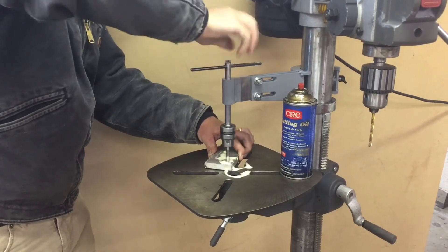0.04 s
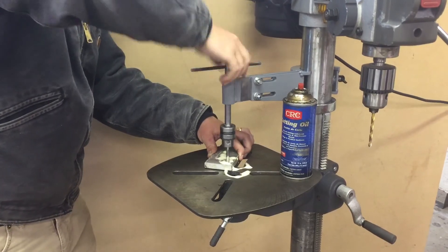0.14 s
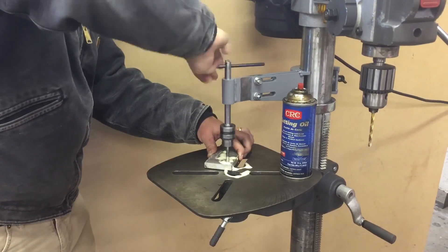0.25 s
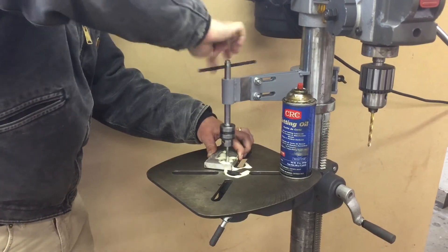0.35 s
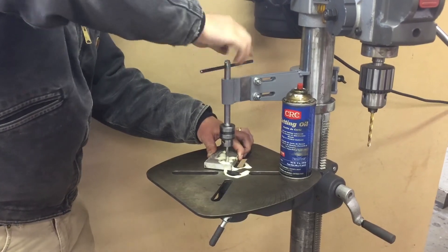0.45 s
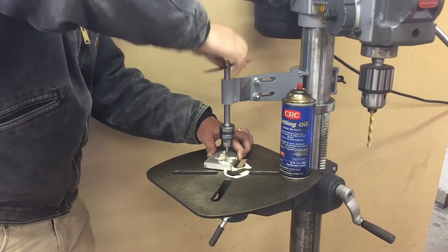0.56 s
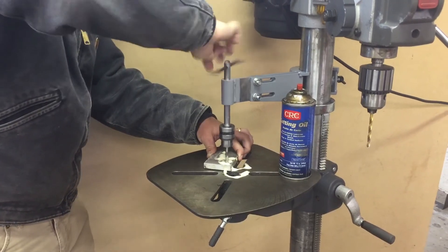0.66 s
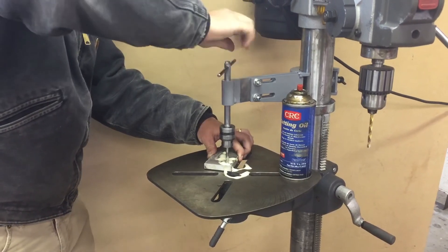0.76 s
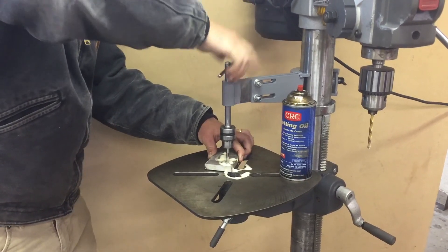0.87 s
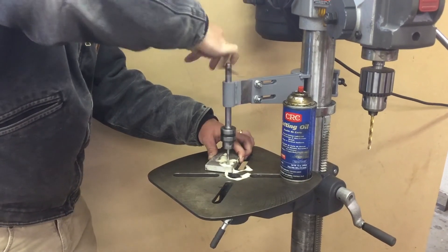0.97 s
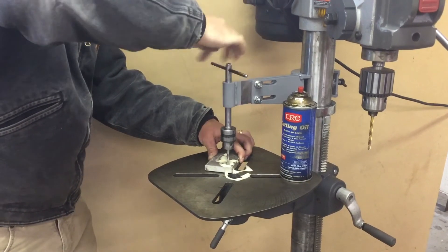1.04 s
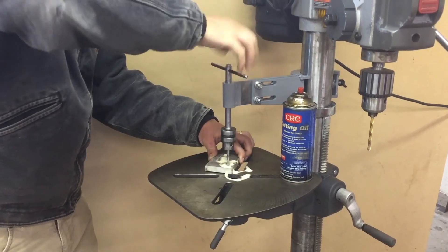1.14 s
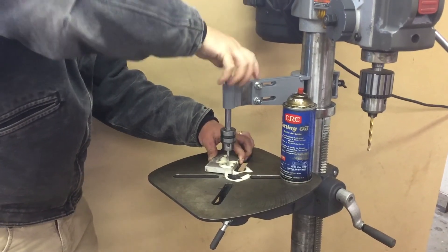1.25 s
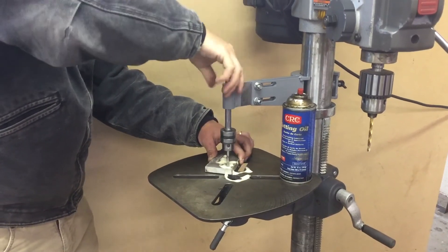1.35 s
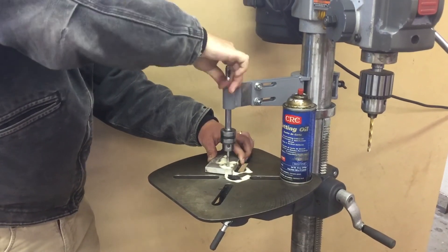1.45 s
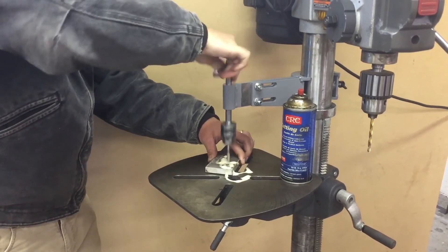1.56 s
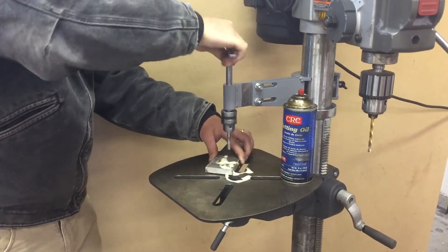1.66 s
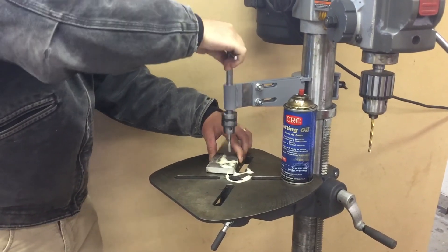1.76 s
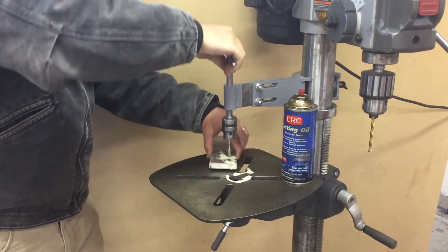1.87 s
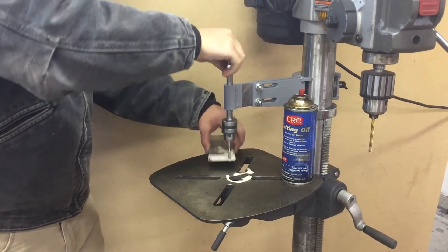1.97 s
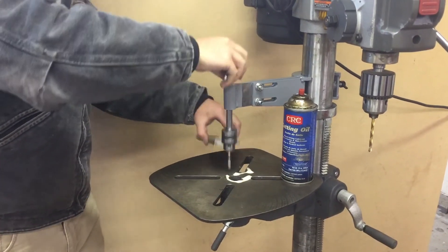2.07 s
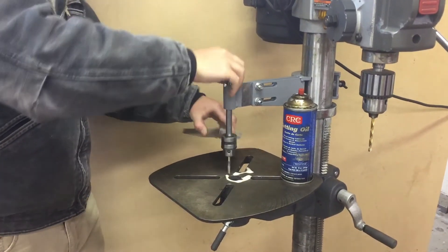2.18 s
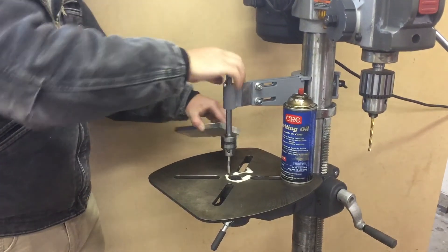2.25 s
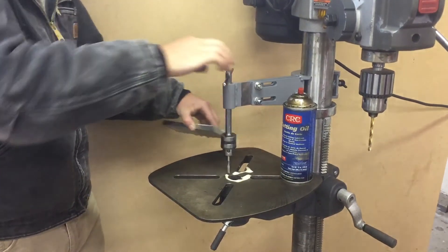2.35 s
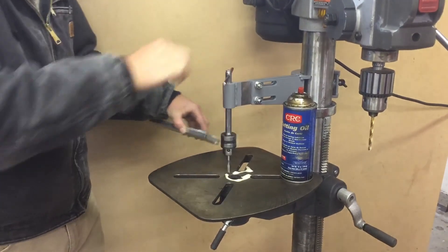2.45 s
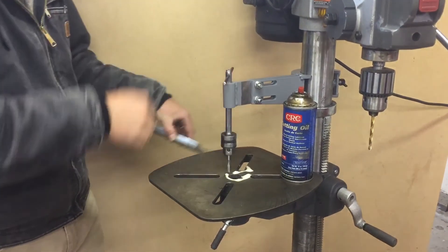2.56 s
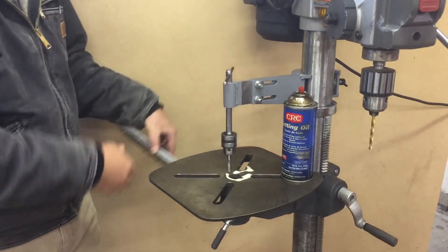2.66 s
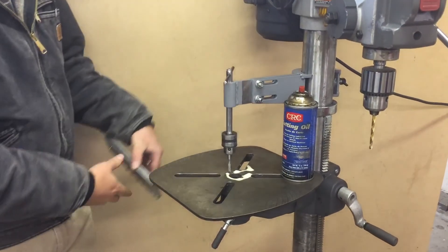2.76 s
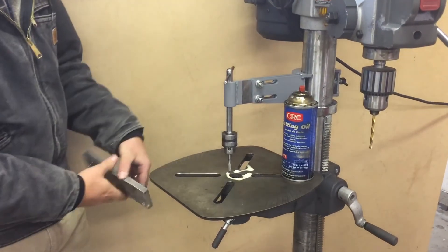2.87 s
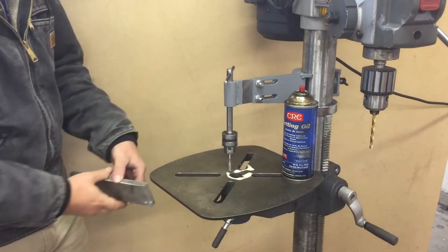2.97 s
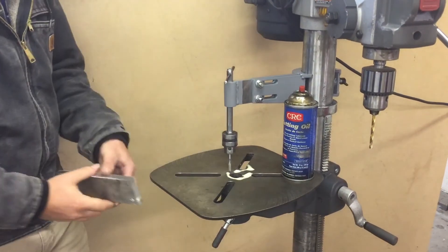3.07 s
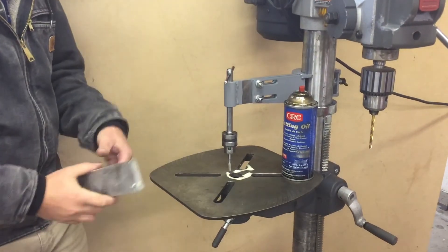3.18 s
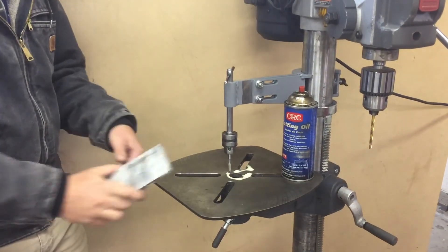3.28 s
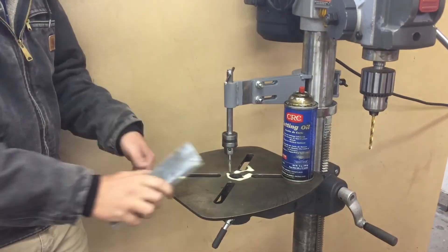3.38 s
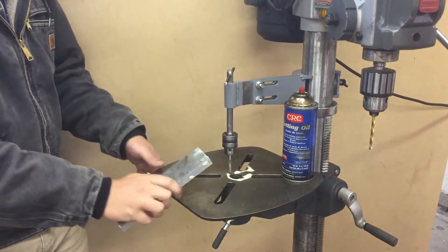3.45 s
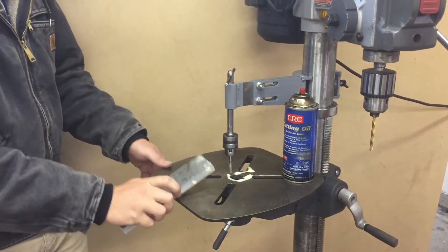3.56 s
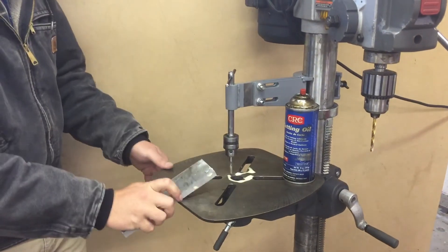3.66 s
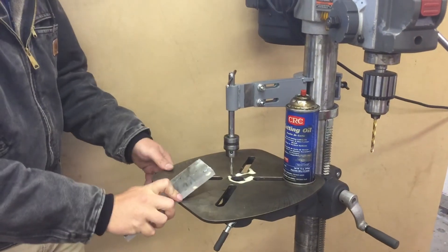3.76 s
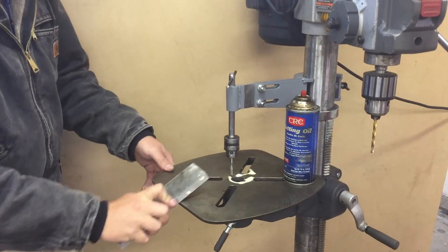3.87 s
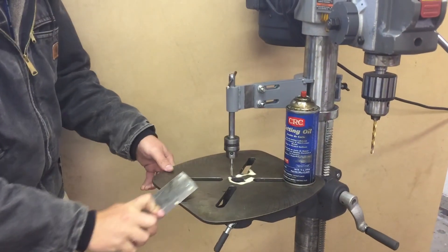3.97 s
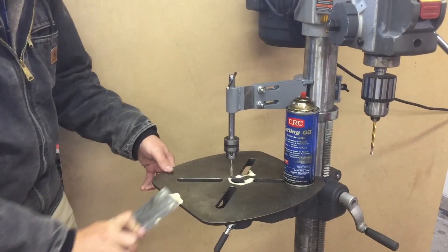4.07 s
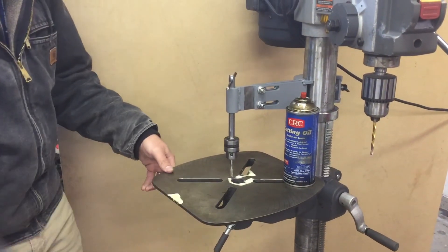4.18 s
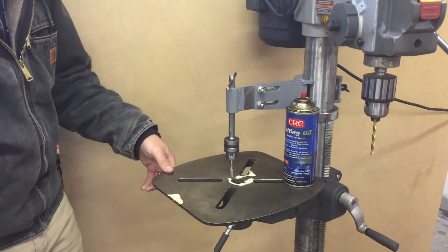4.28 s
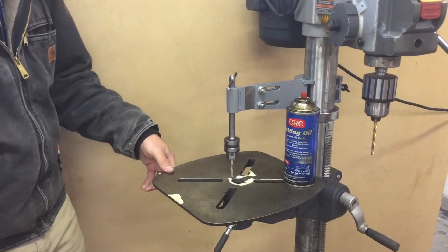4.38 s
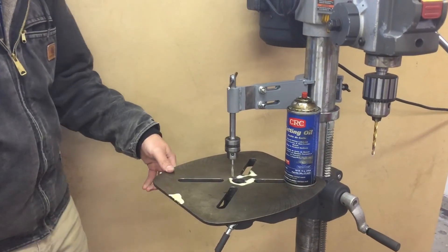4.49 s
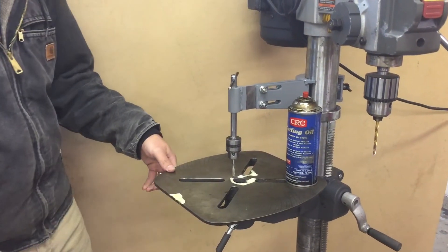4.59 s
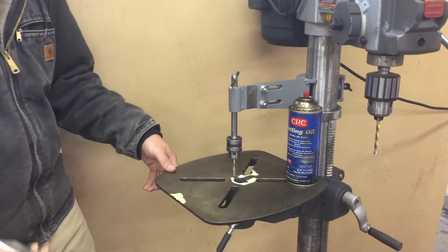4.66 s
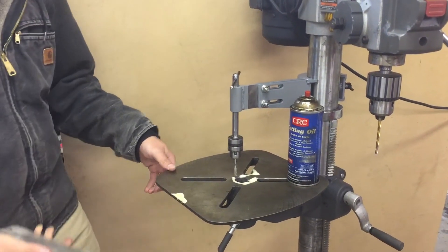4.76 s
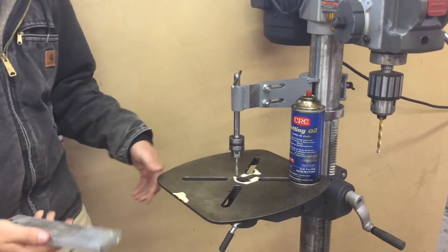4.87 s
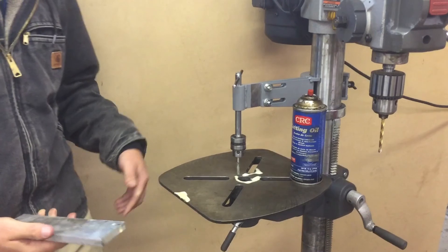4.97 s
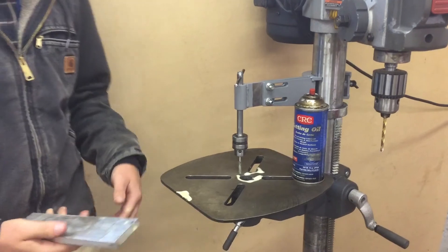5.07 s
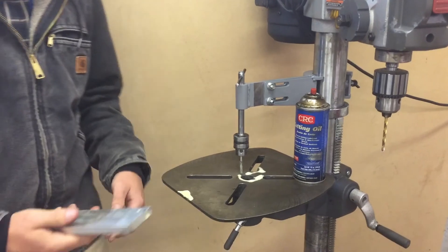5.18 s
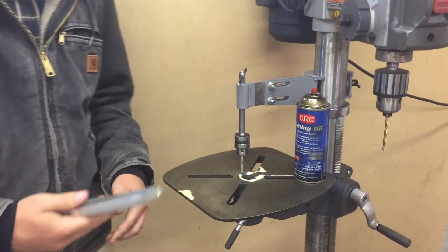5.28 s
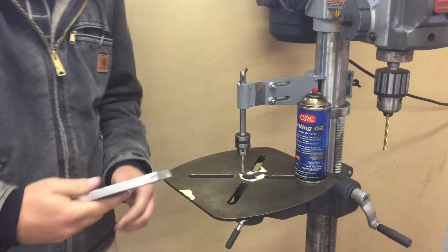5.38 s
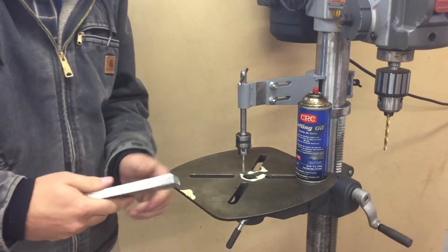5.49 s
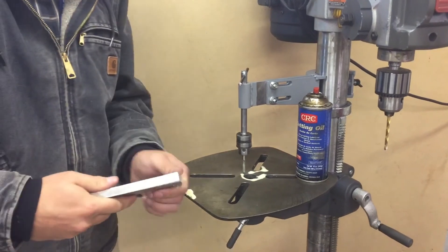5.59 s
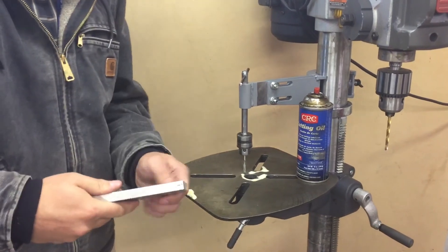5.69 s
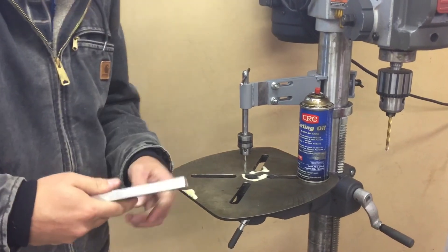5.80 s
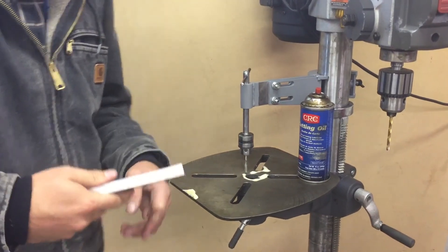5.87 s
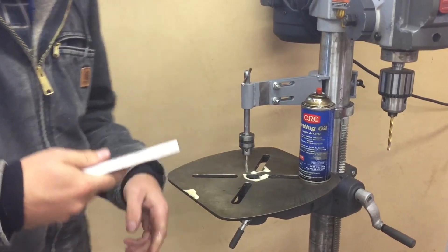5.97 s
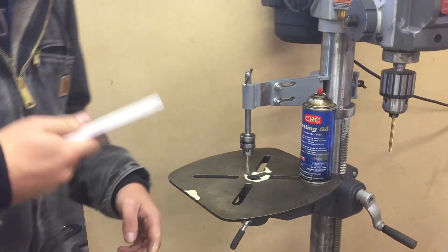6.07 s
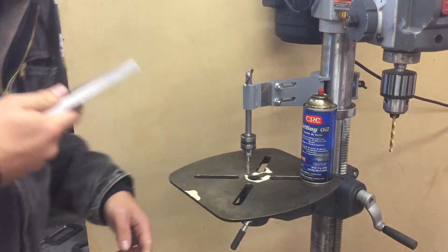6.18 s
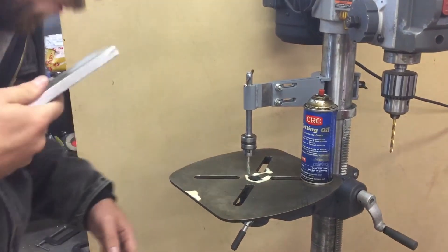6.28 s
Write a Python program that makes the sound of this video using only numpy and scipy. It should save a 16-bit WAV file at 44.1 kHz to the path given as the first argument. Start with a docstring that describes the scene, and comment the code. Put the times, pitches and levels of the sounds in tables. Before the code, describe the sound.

In a small hard-walled shop, a hand tap rasps in an aluminium plate, a chuck clacks, then metal knocks and drags on an iron table.

```python
"""Freeing a tap on a drill press

A hand tap is spun out of an aluminium plate on the iron table of a drill press: three light rasps, a harder
one and a faint last one, with a clack of the chuck and a knock on the table. The plate then bumps and drags
along the table edge, and hands and sleeves rub. Rubbing is built from dense random slips and blows from short
noise bursts, both coloured by the bodies that ring. Chirps are brief noise bands. A small hard-walled shop
rings on briefly through random echoes, over filtered hiss and a low hum made of a wavering tone and noise."""
import sys
import numpy as np
from scipy import signal
from scipy.io import wavfile
from scipy.ndimage import uniform_filter1d

SR = 44100
rng = np.random.default_rng(int(sys.argv[2]) if len(sys.argv) > 2 else 0)


def dump(signal):
    """Clip the signal to [-1, 1] and save it as 16-bit WAV at the path in sys.argv[1]."""
    limited = np.clip(np.atleast_2d(signal).T, -1, 1)
    pcm = np.round(limited * 32767).astype(np.int16)
    wavfile.write(sys.argv[1], SR, pcm)


N = 279278  # length in samples

# Strokes: the tap rasping in its thread, the chuck rattling on after its clack, the plate dragged along the
# table edge, hands and sleeves rubbing. Each row: start in seconds, rise in seconds, hold in seconds, fall in
# seconds, level in dB before colouring, drift over the hold in dB, brightness in dB per octave at full level,
# low-end weight at the start in dB.
TAP_RASPS = [(.235, 0.035, 0.032, 0.06, -35.5, -0.5, -2, -15.5),
             (.609, 0.0061, 0.088, 0.096, -40, -2, -1.5, -14.5), (.95, 0.069, .05, .1, -39, -5, -1, -3.5),
             (1.575, .047, .093, .004, -31.5, -8.5, 1.5, -10.5),
             (2.03, 0.06, 0.14, 0.0034, -51, 0, -1.5, -1)]
CHUCK_RATTLE = [(1.746, .004, 0.057, 0.17, -37.5, -5.5, -3, -4),
                (1.865, 0.015, 0.018, 0.16, -38, -4, -2.5, -4)]
PLATE_DRAG = [(3.83, 0.14, 0.22, 0.068, -27.5, -1.3, -0.24, -5.5)]
HAND_RUBS = [(0.0, .004, .01, 0.16, -64.5, -5.5, -3.5, 13.5), (2.66, 0.049, 0.025, .12, -64.5, 2, -2.5, -1),
             (2.83, 0.029, 0.029, .04, -64, 3.5, -1, -5), (2.93, 0.14, 0.079, 0.055, -50.5, 4, -2, -9),
             (4.772, 0.027, 0.0092, 0.098, -65.5, -0.5, -0.5, -4),
             (5.07, 0.017, 0.036, 0.044, -52, 10.5, -3, 2.5), (5.2, 0.29, 0.062, 0.23, -62.5, 3, -1.5, -7),
             (5.76, 0.022, 0.12, 0.063, -56.5, 9.5, 0, -7), (6.21, 0.034, .028, .004, -56, 13.5, -1, 2.5),
             (6.262, 0.0055, 0.039, 0.0036, -41.5, 2, -2, -8.5),
             (6.29, 0.044, 0.0035, .004, -27, 0, -3.5, -6)]

# How strokes of each kind start and end. Each holds: start level in dB against the full level, change over the
# fall in dB, low-end weight aimed for in dB, share of the way there that is covered, brightness in dB per
# octave lost for each dB of quiet (a negative value brightens).
RASP_WAY = (-31.5, -42.5, 9, 1.11, 0.0683)
RATTLE_WAY = (-9, -27.5, 2, 0.7, 0.48)
DRAG_WAY = (-32, -20, 7, 0.78, 0.2025)
RUB_WAY = (-33.5, -32, 0.1, 0.52, -0.2322)

# Blows: the tap catching, the chuck clacking, the plate knocking on the table, the plate bumping the table
# edge, fingers meeting the plate. Each row: start in seconds, starting level in dB before colouring,
# brightness in dB per octave, low-end weight in dB, time for the chatter to fall by 60 dB in seconds.
TAP_CATCHES = [(.613, -38, -6.5, -9.5, 0.09), (1.0245, -27, 4.5, -27, 0.014),
               (1.619, -25.5, 6.5, -3, 0.015)]
CHUCK_CLACKS = [(1.7185, -12, 2.5, 0, 0.041), (1.7235, -15.5, -4, -6, 0.11), (1.76, -30, -6, 2, 0.094)]
TABLE_KNOCKS = [(2.2045, -22.5, 2, 9.5, 0.033), (2.212, -17.5, 0, 0, 0.1), (2.232, -16, -4.5, -12, 0.095)]
PLATE_BUMPS = [(3.686, -13, -4, -6, 0.099), (3.694, -13.5, 1.5, 4, 0.026), (3.702, -13.5, 3, -0.5, 0.036),
               (3.711, -22.5, -8, 11, 0.027), (3.744, -24, 2, 14, 0.022)]
FINGER_SNAPS = [(4.793, -48, -0.5, -20, 0.012), (5.0853, -42, 1, -8, 0.031), (5.7662, -56, 8, -1.0, 0.015),
                (5.9559, -43, -4.5, -9, 0.036), (6.2313, -47.5, 2, -13, 0.014),
                (6.264, -45, -8, -6, 0.0087)]

# What rings: the rig around the tap, the chuck, the table, the plate when struck, the plate pressed on the
# iron, the skin. Each holds two lists. Rows of the broad response: frequency in Hz, relative level in dB.
# Rows of the modes that stand out: frequency in Hz, width in Hz (32 at the least is used), level in dB
# before the shift given in the call.
RIG_BODY = ([(60, -52.5), (110, -28), (160, -4), (230, -18), (330, -4.5), (600, -0.5), (870, -13),
             (1100, -2.5), (1400, -9.5), (1800, 0), (2500, -4.5), (4300, -11.5), (5000, -17), (6500, -25),
             (7500, -30), (9000, -28.5), (13000, -41.5), (16000, -45.5)], [(156, 27, -7.5), (676, 27, 4.5),
             (1830, 29, -0.5), (1860, 110, -5.5), (2416, 23, -3), (2750, 120, -10), (3200, 19, -4.5),
             (3276, 15, -2.5), (3820, 17, -5.5), (4426, 200, -18.5), (5450, 89, -14.5), (5770, 160, -21),
             (6300, 54, -24), (8800, 48, -24)])
CHUCK_BODY = ([(180, -28.5), (300, -6), (574, -4.5), (750, -16.5), (1120, -9.5), (2170, -4.5), (3080, -5),
               (4500, -3.5), (6000, -10), (7800, -19), (11000, -17), (12300, -29.5), (13600, -15.5),
               (15000, -23.5), (16000, -35)], [(374, 39, 0), (870, 23, -8), (2300, 74, -2),
               (2630, 28, -1.5), (3200, 62, 5.5), (2956, 36, -8), (3960, 33, -1.5), (4240, 23, 1),
               (4360, 85, -8.5), (5170, 91, -4), (5760, 35, -12.5), (5950, 36, -6.5), (8700, 46, -12.5),
               (9820, 80, 2.5), (11050, 69, -1), (11500, 29, -21.5), (12040, 42, -17.5), (14800, 35, -24)])
TABLE_BODY = ([(59, -62), (100, -24.5), (277, -13), (502, -12.5), (662, 0.5), (1010, -4.5), (1170, -5),
               (1830, -16), (1950, -11.5), (2860, -8.5), (3400, -14.5), (14400, -36.5), (16000, -30)],
               [(270.3, 24.2, -2), (670, 47, -6.5), (930, 61, 2), (1235, 36, -7.5), (1515, 36, -1.5),
               (1600, 15, 2.5), (1793, 28, 6.5), (2390, 22, -6.5), (2840, 140, -2), (3520, 22, -13),
               (3800, 36, -24), (4220, 36, -9), (5290, 200, -17.5), (6130, 79, -15.5), (7060, 51, -33.5),
               (8700, 41, -24), (9750, 230, -30.5), (10900, 73, -16.5)])
PLATE_BODY = (([(60, -60), (100, -27), (490, -15), (630, -12), (1390, -9), (1830, -3), (3200, -6),
               (4400, -10), (4900, -20), (8300, -27), (16000, -55)], [(620, 60, -11), (1200, 55, -5),
               (1660, 45, 1), (1770, 35, -3), (1860, 40, 0), (2480, 70, -6), (2780, 50, -3), (3445, 45, 0),
               (3530, 40, -5), (4274, 55, -4), (4410, 50, -5), (5240, 60, -17), (6300, 65, -14),
               (8480, 70, -22)]))
PRESSED_PLATE_BODY = ([(59, -41), (100, -16), (114, -70.5), (266, -12.5), (415, -15), (481, -1.5),
                       (535, -9), (930, -6.5), (1520, -3.5), (2630, -9.5), (2860, -2), (4870, -13.5),
                       (5300, -14), (13500, -34.5), (16000, -36.5)], [(1012, 177, -3), (1537, 42, -7),
                       (1637, 65, 4), (1914, 69, 4.5), (2486, 54, 2), (2810, 49, 4.5), (3320, 72, 2),
                       (4494, 71, -3), (5130, 24, -31.5), (5280, 45, -4), (6240, 200, -11.5),
                       (7180, 24, -13), (7090, 33, -29.5), (8200, 28, -15), (8520, 80, -14),
                       (9400, 110, -33)])
SKIN_BODY = ([(120, -43.5), (200, -12), (387, -8), (659, -9.5), (1300, -5.5), (2960, -7.5), (3490, -6.5),
              (10500, -17.5), (15100, -22), (16000, -13.5)], [(660, 120, -2.6)])

# Long rings of the chuck, the iron table and the plate. Each row: frequency in Hz, level in dB against the
# level of the peal, time to fall by 60 dB in seconds.
CHUCK_RING = [(377.5, -3, .4), (574, -3.5, 0.63), (822, -2.5, 0.14), (2940, -2, 0.18), (3100, -2, 0.25),
              (3445, -8, 0.45), (4274, -5.5, 0.25), (9000, -9.5, 0.22), (10710, -4.5, .24)]
IRON_RING = [(533.3, -4.5, 0.24), (663, 0, 0.35), (904, -12, 0.18), (1195, -4, 0.28), (1470, -10, 0.36),
             (1808, -5, 0.35), (1860, -9, 0.35), (2800, -8.5, 0.33), (2966, -4, .2)]
PLATE_RING = [(1265, -13, .3), (1707, 13, .45), (1804, -8.5, 0.28), (1880, -7, 0.11), (3058, 4, 0.33),
              (3590, -12.5, .35), (3526, -7, 0.35), (4380, -16.5, .2), (4240, -12.5, 0.36)]

# Faint, brief chirps and hollow notes. Each row: start in seconds, level in dB before fading in and out,
# pitch in Hz, width in Hz of each of two filters in a row, length in seconds.
CHIRPS = [(0.47, -69.5, 1044, 59.6, 0.053), (1.024, -41, 6150, 500, 0.018), (1.884, -42, 4400, 200, 0.033),
          (2.836, -71, 4420, 99, 0.084), (3.608, -67, 1580, 122.2, 0.049), (5.093, -55, 715, 70.2, 0.098),
          (1.92, -50, 3430, 79, 0.064), (1.952, -63, 920, 121, 0.078), (5.787, -58, 1854, 400, 0.12),
          (5.841, -56, 800, 295, 0.093), (5.882, -52, 1960, 504, 0.046), (6.267, -44.5, 770, 302, 0.062),
          (6.128, -66, 9080, 1487, 0.017)]

# How fast the shop dies away. Each row: frequency in Hz, time to fall by 60 dB in seconds.
SHOP_DECAY = [(200, 0.74), (530, 0.55), (1390, 0.43), (3680, 0.42), (9700, 0.23), (15000, 0.19)]

# Slow level of the low sounds. Each row: time in seconds, hum in dB before its waver, deep rumble in dB.
HUM_LEVELS = [(0.0, -57, -55), (.2, -60, -68), (.42, -56, -67), (.9, -63, -61), (1.27, -63, -68),
              (1.401, -56, -70.5), (2.15, -51, -71), (2.33, -56, -51), (2.46, -52, -66.5), (4.27, -59, -67),
              (4.55, -67.5, -68.5), (5.04, -74, -83.5), (5.13, -58.5, -64), (5.3, -62, -84),
              (5.801, -58, -81.5), (6.01, -63.5, -80), (6.2, -55, -75), (6.33, -61, -72)]

# The column of the press drones when the work jolts it. Each row: time in seconds, starting level in dB
# before the rise.
JOLTS = [(.25, -49), (.45, -54), (.63, -56.5), (1.0, -49.5), (1.6, -52.5), (1.76, -48), (2.209, -54.5),
         (2.419, -62), (3.7, -59), (4.179, -60), (5.09, -68), (6.3, -72)]

# Colour of the room and microphone hiss. Each row: frequency in Hz, relative level in dB.
AIR_COLOUR = [(15, -37), (25, -14.5), (70, -3), (186, -11), (231, -4.5), (456, -20), (536, -17), (974, -19),
              (1310, -19), (4220, -28), (4960, -28), (5680, -29.5), (13500, -35.5), (15100, -32.5),
              (16400, -42)]

# Notches of the microphone housing. Each row: frequency in Hz, width in Hz, gain in dB.
MICROPHONE_DIPS = [(4820, 220, -4.5), (10700, 800, -3.5)]

SHOP_DB = -8.5  # level of the echoes against the direct sound
AIR_DB = -67.5  # level of the part of the hiss above 300 Hz
HUM_HZ, HUM_WANDER_HZ = 77.6, 1.5
HUM_FUZZ_DB, HUM_WAVER_DB = -7, 1
JOLT_RISE_S, JOLT_T60_S, DRONE_REST_DB = 0.019, .9, -76.5
TOP_EDGE_HZ = 15900


def tap():
    """The tap slips in its thread and catches, and the rig around it colours both."""
    rasps = strokes(TAP_RASPS, RASP_WAY, spread_db=1.0, clump_db=-0.14, patchy_db=3.0)
    return ring(rasps + blows(TAP_CATCHES), RIG_BODY, modes_db=2.5)


def chuck():
    """The chuck clacks, rattles on and rings out in clear tones."""
    rattle = strokes(CHUCK_RATTLE, RATTLE_WAY, spread_db=2.0, clump_db=0.0, patchy_db=3.5)
    clatter = ring(rattle + blows(CHUCK_CLACKS), CHUCK_BODY, modes_db=-3.0)
    return clatter + peal(CHUCK_CLACKS[0][0], -28.5, CHUCK_RING)


def table():
    """The plate knocks on the iron table, which rings out."""
    knocks = ring(blows(TABLE_KNOCKS), TABLE_BODY, modes_db=-4.0)
    return knocks + peal(TABLE_KNOCKS[0][0], -26, IRON_RING)


def plate():
    """The plate bumps the table edge and its slowest modes ring out."""
    bumps = ring(blows(PLATE_BUMPS), PLATE_BODY, modes_db=8.0)
    return bumps + peal(PLATE_BUMPS[1][0], -33.5, PLATE_RING)


def drag():
    """The plate slips along the table edge; pressed on the iron it rings otherwise than when struck."""
    slips = strokes(PLATE_DRAG, DRAG_WAY, spread_db=2.5, clump_db=2.0, patchy_db=3.5)
    return ring(slips, PRESSED_PLATE_BODY, modes_db=-1.0)


def hands():
    """Hands and sleeves rub in many small slips, and fingers meet the plate."""
    rubs = strokes(HAND_RUBS, RUB_WAY, spread_db=2.5, clump_db=0.5, patchy_db=4.0)
    return ring(rubs + blows(FINGER_SNAPS), SKIN_BODY, modes_db=5)


def chirps():
    """Each chirp is one narrow band of noise that swells quickly and fades more slowly."""
    out = np.zeros(N)
    for start, level_db, hz, width, length in CHIRPS:
        progress = np.arange(round(length * SR)) / (length * SR)
        tone = resonate(rng.standard_normal(8000), hz, width)[-len(progress):]  # the filter has settled
        add(out, start, amp(level_db) * tone * np.sin(np.pi * np.sqrt(progress)))
    return out


def shop(x):
    """Hard walls return sparse echoes of random sign, each band dying at its own speed."""
    echoes = np.zeros(SR)
    at = np.arange(300, SR - 20, 20)
    at = at + rng.integers(0, 20, len(at))
    echoes[at] = rng.choice([-1., 1.], len(at))
    hz, t, bands = signal.stft(echoes, SR, nperseg=256)
    decay = amp(-60 * t / read(SHOP_DECAY, hz)[:, None])
    tail = signal.istft(bands * decay, SR, nperseg=256)[1]
    return amp(SHOP_DB) * signal.fftconvolve(x, tail / np.linalg.norm(tail))[:N]


def hum():
    """A low, fuzzy tone wanders in pitch and level, with noise rumbling below and a noise-band drone above."""
    t = np.arange(N) / SR
    wander, waver, fuzz, deep, drone = rng.standard_normal((5, N))
    hz = HUM_HZ + HUM_WANDER_HZ * evened(smoothed_twice(wander, 3000))
    pure = np.sqrt(2) * np.sin(2 * np.pi * np.cumsum(hz) / SR)
    tone = evened(pure + amp(HUM_FUZZ_DB) * resonate(fuzz, HUM_HZ, 20))
    waver_db = HUM_WAVER_DB * evened(smoothed_twice(waver, 2500))

    s, hum_db, deep_db = np.transpose(HUM_LEVELS)
    rumble = amp(np.interp(t, s, deep_db)) * resonate(deep, 48, 36)
    shaken = amp(DRONE_REST_DB)
    for at, db in JOLTS:
        decay = amp(db - 60 * (t - at).clip(0) / JOLT_T60_S)
        shaken = shaken + decay * np.clip((t - at) / JOLT_RISE_S, 0, 1)
    return amp(np.interp(t, s, hum_db) + waver_db) * tone + rumble + shaken * resonate(drone, 168, 40)


def air():
    """Steady hiss of room and microphone: coloured noise, slightly patchy in time and pitch."""
    frames, hz = N // 256 + 5, np.fft.rfftfreq(1024, 1 / SR)
    real, imaginary, patches = rng.standard_normal((frames, 513, 3)).T
    patches = uniform_filter1d(patches, size=12, axis=0)
    patches = evened(uniform_filter1d(patches, size=14, axis=1))
    bands = (real + 1j * imaginary) * amp(read(AIR_COLOUR, hz)[:, None] + 1.2 * patches)
    hiss = signal.istft(bands, nperseg=1024, noverlap=768)[1][:N]
    above = signal.sosfilt(signal.butter(4, 300, "high", fs=SR, output="sos"), hiss)
    return amp(AIR_DB) * hiss / above.std()


def strokes(rows, way, spread_db, clump_db, patchy_db):
    """Rubbing is dense slips of uneven size, whose strength can vary in clumps of a few milliseconds."""
    out = np.zeros(N)
    for row in rows:
        s, level_db, slope_db, weight_db = course(row, way)
        t = s[0] + np.arange(SR) / SR
        sign, size, clump = rng.standard_normal((3, len(t)))
        clump = evened(uniform_filter1d(clump, size=150))
        slips = evened(sign * amp(spread_db * size + clump_db * clump))
        end_fade = np.clip((s[-1] - t) / .002, 0, 1)
        level = amp(np.interp(t, s, level_db)) * end_fade
        add(out, s[0], tilted(slips, t, s, slope_db, weight_db, patchy_db) * level)
    return out


def course(row, way):
    """A stroke rises, holds while its level drifts, and falls; its brightness and low end change as it goes."""
    start, rise, hold, fall, level_db, drift_db, slope_db, weight_db = row
    start_db, fall_db, end_weight_db, share, dulling = way
    u = np.linspace(0, 1, num=6)
    s = np.concatenate([rise * u, rise + hold + fall * u])
    quiet_db = np.concatenate([start_db * (1 - u) ** 1.5, fall_db * u])
    drifted_db = drift_db * np.clip((s - rise) / max(hold, .001), 0, 1)
    slope_db = slope_db + dulling * quiet_db
    weight_db = weight_db + share * (end_weight_db - weight_db) * s / s[-1]
    return start + s, level_db + quiet_db + drifted_db, slope_db, weight_db


def blows(events):
    """Each contact is a sudden burst of chatter, random in sign, that dies fast."""
    out, t = np.zeros(N), np.arange(6000) / SR
    for start, level_db, slope_db, weight_db, t60 in events:
        signs = rng.choice([-1., 1.], len(t))
        chatter = tilted(signs, t, [0], [slope_db], [weight_db], patchy_db=-2.63)
        decay = amp(level_db - 60 * t / max(t60, .002))
        add(out, start, chatter * decay * np.minimum(t / 0.0006, 1))
    return out


def peal(start, blow_db, modes):
    """The slowest modes, set going at once by a hard blow, ring out as clear decaying tones."""
    out, t = np.zeros(N), np.arange(SR // 2) / SR
    tones = 0
    for hz, db, t60 in modes:
        tones = tones + amp(db - 60 * t / t60) * np.sin(2 * np.pi * (hz * t + rng.random()))
    add(out, start, amp(blow_db) * tones * np.minimum(t / 0.0089, 1))
    return out


def ring(x, body, modes_db):
    """A body colours what excites it: a broad spectrum plus narrow modes, answering without delay."""
    broad, modes = body
    hz = abs(np.fft.fftfreq(16384, 1 / SR))
    power = amp(read(broad, hz)) ** 2
    for f, width, db in modes:
        power = power + amp(db + modes_db) ** 2 / (1 + (2 * (hz - f) / max(width, 32)) ** 4)
    log_gain = np.log(power + 1e-10) / 2
    phase = -signal.hilbert(log_gain).imag  # puts the energy as early as it can be
    taps = np.fft.ifft(np.exp(log_gain + 1j * phase)).real[:8192]
    return signal.oaconvolve(x, taps / np.linalg.norm(taps))[:N]


def tilted(x, t, s, slope_db, weight_db, patchy_db):
    """A contact's treble tilts about 2.5 kHz, its low end is weighted, and random bands come and go."""
    hz, frames, bands = signal.stft(x, SR, nperseg=128)
    octaves = np.log2(np.clip(hz, 1000, None) / 2500)[:, None]
    low = 1 / (1 + (hz[:, None] / 1200) ** 4)
    frames = frames + t[0]
    patches = rng.standard_normal(bands.shape[::-1])
    patches = evened(uniform_filter1d(patches, size=16, axis=0)).T  # smooth in time
    slope = octaves * np.interp(frames, s, slope_db)
    weight = low * np.interp(frames, s, weight_db)
    bands = bands * amp(slope + weight + patchy_db * patches)
    return signal.istft(bands, SR, nperseg=128)[1][:len(x)]


def resonate(x, hz, width):
    """Two equal resonances in a row leave a band around hz, steep on both sides."""
    b, a = signal.iirpeak(hz, hz / width, SR)
    once = signal.lfilter(b, a, x)
    return evened(signal.lfilter(b, a, once))


def smoothed_twice(x, size):
    """Two running averages turn noise into a slow wander."""
    return uniform_filter1d(uniform_filter1d(x, size=size), size=size)


def amp(db):
    """Turns decibels into gain."""
    return 10 ** (np.asarray(db) / 20)


def evened(x):
    """Scales to an average strength (rms) of 1."""
    return x / np.sqrt(np.mean(x ** 2) + 1e-20)


def read(points, hz):
    """Reads a table between its rows on a log-frequency axis."""
    f, value = np.transpose(points)
    return np.interp(np.log(hz + 1), np.log(f + 1), value)


def add(mix, start, sound):
    """Mixes a sound in at start seconds."""
    part = mix[round(start * SR):][:len(sound)]
    part += sound[:len(part)]


def scene():
    """Everything near the press sounds in the shop, over its air and hum."""
    near = tap() + chuck() + table() + plate() + drag() + hands() + chirps()
    return (near + shop(near) + hum() + air())[None]


def record(dry):
    """The microphone drops the deepest bass and has two notches; the top of the treble is then cut off."""
    out = signal.sosfilt(signal.butter(4, 36, "high", fs=SR, output="sos"), dry)
    for hz, width, db in MICROPHONE_DIPS:
        b, a = signal.iirpeak(hz, hz / width, SR)
        out = out - (1 - amp(db)) * signal.lfilter(b, a, out)
    low_pass = signal.firwin(511, TOP_EDGE_HZ, window=("kaiser", 9), fs=SR)
    return signal.oaconvolve(out, low_pass[None], "same")


dry = scene()
out = record(dry)
dump(out)
```